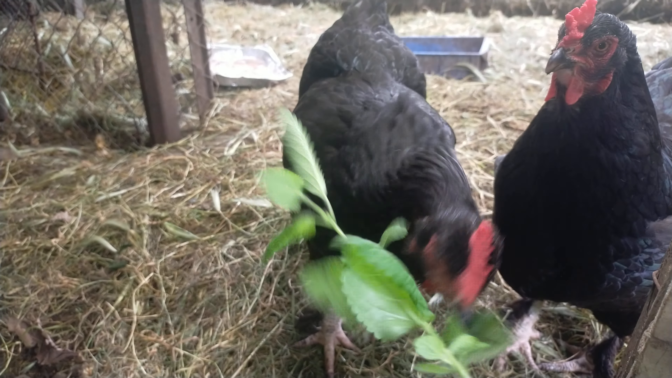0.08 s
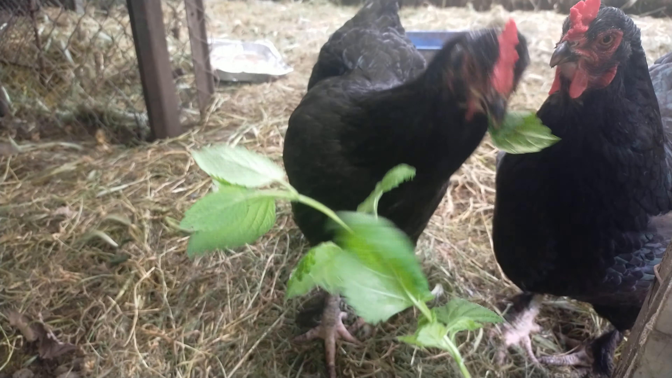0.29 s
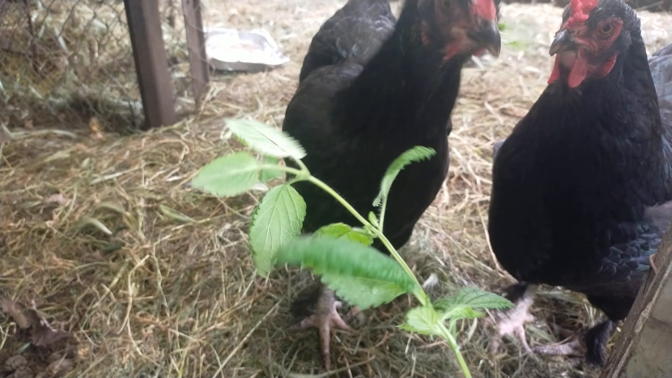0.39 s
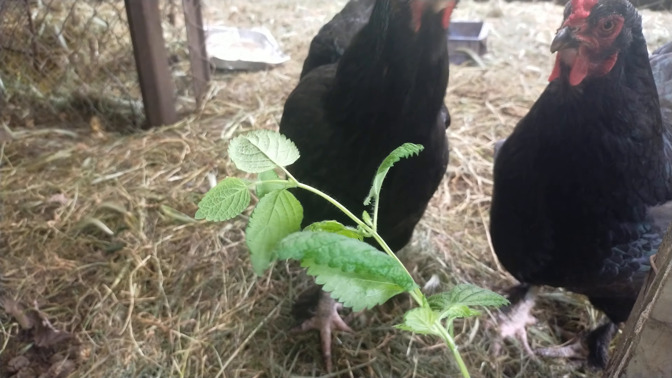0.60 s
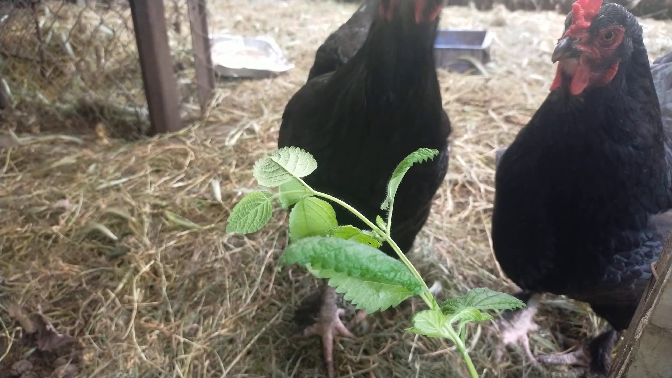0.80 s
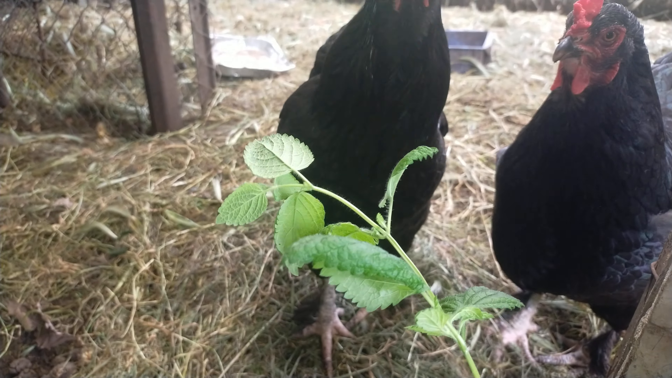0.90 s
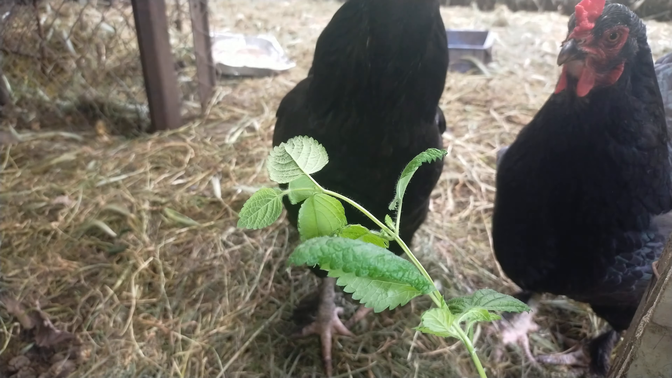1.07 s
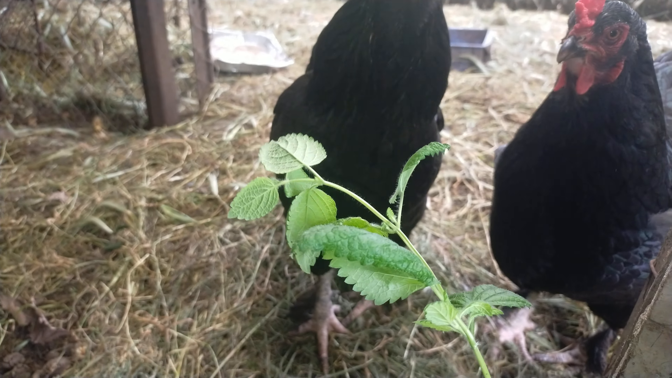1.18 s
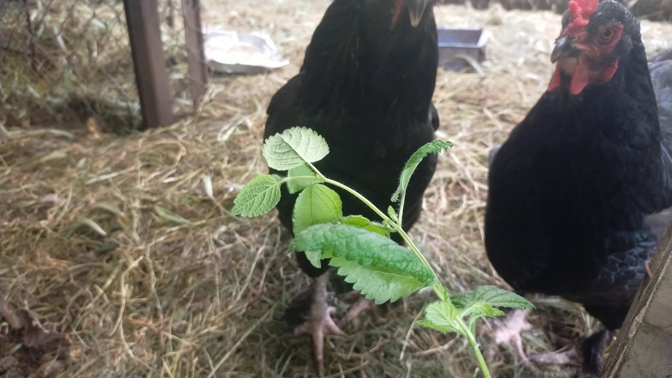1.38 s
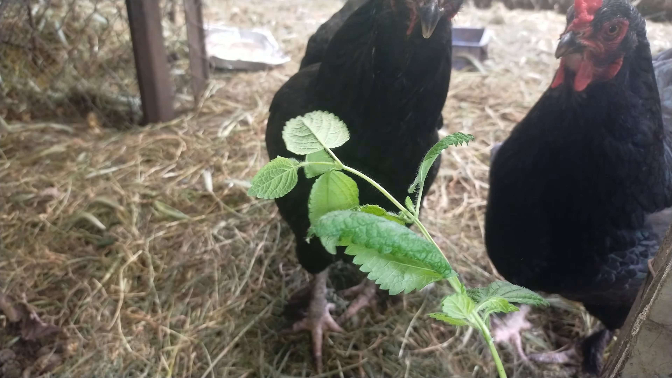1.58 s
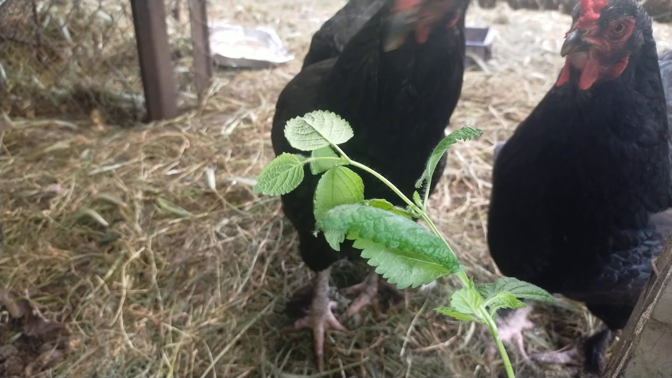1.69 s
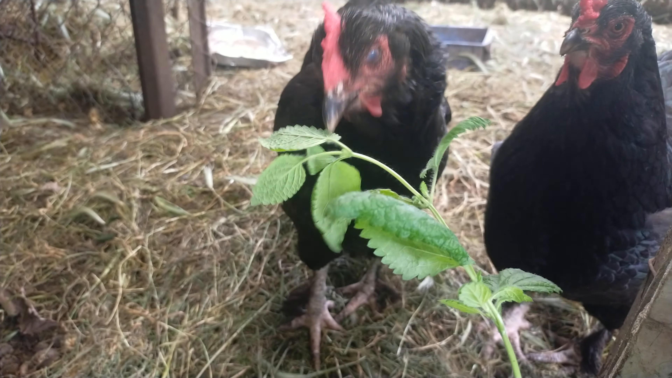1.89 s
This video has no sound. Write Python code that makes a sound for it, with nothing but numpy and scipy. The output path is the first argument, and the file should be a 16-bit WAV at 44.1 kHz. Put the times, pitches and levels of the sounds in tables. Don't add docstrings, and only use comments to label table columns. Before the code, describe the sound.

Leaf ripped by a pecking hen, crisp snaps and dull little thumps over faint outdoor hum

```python
import sys
import numpy as np
from scipy import signal
from scipy.fft import rfft, irfft
from scipy.io import wavfile

SR = 44100
rng = np.random.default_rng(int(sys.argv[2]) if len(sys.argv) > 2 else 0)


def inscribe(sig):
    pcm = np.round(np.clip(np.atleast_2d(sig).T, -1, 1) * 32767)
    wavfile.write(sys.argv[1], SR, pcm.astype(np.int16))


def how_loud(loudness_db):
    steps = np.asarray(loudness_db, float) / 20
    return 10 ** steps


N = 83790


def at_hz(points, hz):
    points_hz, points_db = np.transpose(points)
    return np.interp(np.log(hz), np.log(points_hz), points_db)


def rms_one(x):
    return x / np.sqrt(np.mean(x ** 2) + 1e-20)


def drift(rate_hz):
    r = np.exp(-80 * np.pi * rate_hz / SR)
    slow = signal.lfilter([1], [1, -2 * r, r * r], rng.standard_normal(N // 40 + 2002))[2000:]
    return np.interp(np.arange(N) / 40, np.arange(len(slow)), rms_one(slow))


def ring(x, hz, t60_s):
    r, w = how_loud(-60 / (t60_s * SR)), 2 * np.pi * hz / SR
    return signal.lfilter([0, np.sin(w)], [1, -2 * r * np.cos(w), r * r], x + 1e-18)


def banded_noise(spectrum, patchy_db, rate_hz):
    hz = np.maximum(np.arange(N // 2 + 1) * SR / N, 1)
    shaped = rfft(rng.standard_normal(N)) * how_loud(at_hz(spectrum, hz))
    out, together = 0, drift(1.6)
    for centre in 20 * 2 ** np.arange(0, 9.1, .5):
        window = np.cos(np.pi * np.clip(np.log2(hz / centre), -.5, .5)) ** 2
        flicker = how_loud(patchy_db * (0.44 * together + drift(rate_hz)))
        out = out + irfft(shaped * window, N) * flicker
    return rms_one(out)


# hz, level_db (per Hz)
HUM_COLOUR, HUM_DB = [(15, -50), (25, -2.5), (124, -6), (294, -21.5), (450, -21.5), (1050, -16.5),
                      (2500, -42), (3250, -76), (5500, -120)], -60.5
# hz, level_db (per Hz)
AIR_COLOUR, AIR_DB = [(1350, -45.5), (2300, -12.5), (3550, -12), (4600, -8.5), (7410, -1), (8300, -10.5),
                      (10800, -59.5), (18300, -120)], -77


def background():
    air = how_loud(AIR_DB) * banded_noise(AIR_COLOUR, patchy_db=.7, rate_hz=14.0)
    hum = how_loud(HUM_DB) * banded_noise(HUM_COLOUR, patchy_db=-0.3, rate_hz=1.0)
    return hum + air


# hz, level_db
BODY_MODES = [(1000, -14), (1500, -3), (2250, -1), (3500, -2.5), (4700, -11)]
BODY_LOW_HZ, BODY_HIGH_HZ = 595, 5000
CRACK_CYCLES = 10.5
PORT_HZ, PORT_T60_S, PORT_DB = 7570, 0.0028, -9


def crack_sound(clicks, colour):
    dealt, bright = rng.integers(0, 12, N), 0
    for k, hz in enumerate(np.geomspace(4700, 8000, 12)):
        onset = ring(clicks * (dealt == k), hz, CRACK_CYCLES * 2 / hz)
        bright = bright + how_loud(at_hz(colour, hz)) * ring(onset, hz, CRACK_CYCLES / hz)
    bright = bright + how_loud(PORT_DB) * ring(bright, PORT_HZ, PORT_T60_S)
    body_band = signal.butter(1, [BODY_LOW_HZ, BODY_HIGH_HZ], "band", fs=SR, output="sos")
    body = how_loud(4.0) * signal.sosfilt(body_band, clicks)
    for hz, db in BODY_MODES:
        patchy = how_loud(db + 6.3 * drift(20.0))
        body = body + patchy * ring(clicks, hz * (1 + 0.076 * rng.standard_normal()), 0.0043)
    return bright, body


CRACKS_PER_S, CRACK_SPREAD_DB, HISS_DB = 1700, 2.5, -2


def crackle(moves, colour, body_db):
    t, power = np.arange(N) / SR, 0
    for peak_s, rise_s, fall_s, db in moves:
        away = np.where(t < peak_s, (peak_s - t) / rise_s, (t - peak_s) / fall_s)
        power = power + how_loud(2 * db) * np.exp(-2 * away)
    sizes = how_loud(CRACK_SPREAD_DB * np.minimum(rng.exponential(1, N), 4)) * rng.choice([-1, 1], N)
    cracks = rms_one(sizes * (rng.random(N) < CRACKS_PER_S / SR))
    clicks = cracks + how_loud(HISS_DB) * rng.standard_normal(N)
    bright, body = crack_sound(clicks, colour)
    return np.sqrt(power) * (rms_one(bright) + how_loud(body_db) * rms_one(body))


# peak_s, rise_s, fall_s, level_db
RUSTLES = [(.02, 0.051, 0.087, -70.5), (.07, 0.0056, 0.012, -63.5), (0.092, 0.0076, 0.004, -61),
           (0.13, 0.0097, 0.0082, -37), (0.153, 0.006, 0.028, -50.5), (0.233, 0.0048, 0.0062, -56),
           (0.291, 0.086, 0.078, -56), (0.374, .012, 0.011, -46), (.388, .004, 0.0031, -53),
           (0.518, 0.011, 0.0095, -51.5), (0.566, 0.036, 0.019, -55), (.65, .02, 0.032, -61),
           (.705, 0.0058, 0.0077, -51.5), (.815, 0.032, 0.029, -60), (.865, 0.015, 0.005, -57.5),
           (.95, 0.43, 0.19, -74.5), (1.09, .04, 0.026, -64.5), (1.274, 0.031, 0.034, -54),
           (1.317, .004, 0.0038, -61), (1.352, 0.004, 0.01, -54), (1.9, 0.0063, 0.0085, -69)]
# hz, level_db
LEAF_COLOUR = [(2650, -55), (4500, -21.5), (4970, -29.5), (7150, 4.5), (7830, -12.5), (8300, -28.5),
               (10800, -55), (18300, -120)]


def leaf_rustles():
    return crackle(RUSTLES, LEAF_COLOUR, body_db=-20.5)


# start_s, peak_db, pitch_hz, swell_cycles
THUMPS = [(0.0536, -35, 513, 0.11), (0.131, -36, 746, 0.12), (0.2113, -41.5, 934, 1.3),
          (0.2092, -46.5, 561, 0.99), (.209, -57.5, 304, 2.1), (0.2555, -45, 1298, 0.39),
          (.346, -48.5, 100, 0.75), (0.3507, -32, 520, 0.12), (0.3975, -44, 507, 0.12),
          (.4085, -33, 440, 0.19), (.441, -54, 1100, 3.5), (.4543, -31.5, 324, 0.4),
          (0.4641, -36, 330, 0.2), (0.4848, -28.5, 312, 0.5), (.4822, -43, 250, .3), (0.485, -44, 86, 0.7),
          (.5057, -46, 350, 0.2), (.606, -55, 880, 3), (.7535, -55, 900, 1.6), (0.906, -46.5, 760, 0.72),
          (0.906, -50, 930, 1.9), (0.9165, -49.5, 870, 1.8), (.919, -47, 780, 0.46),
          (1.055, -46, 92.6, 0.42)]
THUMP_CUT_HZ, THUMP_TICK_DB = 1700, -19
BRIGHT_EDGE_HZ, TICK_RING_HZ = 4500, 6900


def brighten(x):
    return signal.sosfilt(signal.butter(7, BRIGHT_EDGE_HZ, "high", fs=SR, output="sos"), x)


def thumps():
    dull, ticks, t = np.zeros(N + SR), np.zeros(N + SR), np.arange(4000) / SR
    for start_s, db, hz, cycles in THUMPS:
        at = int(start_s * SR)
        swell = t * hz / cycles
        dull[at:at + 4000] -= how_loud(db) * np.sin(2 * np.pi * hz * t) * swell * np.exp(1 - swell)
        burst = rng.standard_normal(4000) * np.exp(-((t - .0006) / 0.0002) ** 2)
        ticks[at:at + 4000] += how_loud(db) * (hz > 200) * burst
    dull = signal.sosfilt(signal.butter(2, THUMP_CUT_HZ, fs=SR, output="sos"), dull)
    tick_sound = brighten(ticks) + how_loud(-9) * ticks + how_loud(-2.5) * ring(ticks, TICK_RING_HZ, 0.004)
    return (dull + how_loud(THUMP_TICK_DB) * tick_sound)[:N]


# start_s, peak_db, pitch_hz
FAINT_SNAPS = [
    (.0873, -51, 7400),
    (.0915, -47, 7200),
    (.1712, -44, 6900),
    (.1868, -46, 7000),
    (.9058, -53, 7000),
    (1.138, -54, 7000),
    (1.208, -54.5, 7300),
    (1.418, -61, 7200),
]
# start_s, peak_db, pitch_hz
TEAR = [(0.1097, -39, 7160), (0.1165, -41, 6820), (0.1188, -39, 6940), (0.1206, -41, 6970),
        (0.124, -40, 6720), (0.1253, -35, 7180), (0.1268, -26, 7300), (0.1281, -23, 7380),
        (0.1307, -27, 6950), (0.1324, -30, 6720), (0.1349, -33, 7230), (0.137, -38, 7180),
        (0.1409, -40, 6990), (0.1465, -41, 6950), (0.1534, -34, 7230), (0.1565, -42, 6870),
        (0.1625, -42, 7000), (0.2047, -43, 6900), (0.2067, -10, 6790), (0.2091, -17, 6800),
        (0.2105, -7, 6560), (0.2123, -11, 6830), (0.2135, -5, 6580), (0.2156, -21, 6400),
        (0.217, -22, 6450), (0.2183, -18, 6390), (0.2215, -22, 6650), (0.2235, -26, 6550),
        (0.2252, -40, 6570), (0.2274, -28, 7140), (0.2303, -31, 7220), (0.232, -35, 7090),
        (0.2343, -28, 7100), (0.2371, -30, 7040), (0.2389, -35, 7200), (0.2409, -39, 6860),
        (0.2426, -43, 6640), (0.244, -39, 6900), (0.2479, -34, 6900), (0.2496, -36, 7420),
        (0.2508, -36, 7030), (0.2528, -40, 7020), (0.2538, -23, 7180), (0.2557, -31, 7010),
        (0.2587, -36, 6870), (0.26, -41, 7060)]
# start_s, peak_db, pitch_hz
SNAPS = [(0.3623, -43, 7090), (0.3651, -44, 6570), (0.3663, -41, 7030), (0.3688, -44, 7070),
         (0.3707, -37, 6940), (0.374, -39, 7080), (0.3762, -37, 6910), (0.3796, -44, 7060),
         (0.3809, -40, 7100), (0.3832, -44, 6950), (0.3875, -37, 7290), (0.4213, -37, 7110),
         (0.4224, -42, 7040), (0.4236, -40, 6700), (0.425, -44, 6650), (0.4271, -40, 6360),
         (0.4385, -45, 6710), (0.4396, -35, 6620), (0.4419, -38, 6670), (0.4433, -43, 7140),
         (0.4533, -32, 7030), (0.4594, -43, 6750), (0.461, -38, 6880), (0.4624, -42, 6990),
         (0.4647, -43, 7070), (0.4672, -42, 6960), (0.4841, -44, 6820), (0.4872, -44, 6000),
         (0.5239, -44, 6800), (0.5518, -42, 7070), (0.5589, -43, 6920), (0.5611, -43, 7160),
         (0.5628, -43, 7280), (0.5697, -42, 7010), (0.5721, -41, 6990), (0.5785, -40, 6520),
         (0.5956, -42, 6870), (0.5978, -45, 7270), (0.7032, -46, 7120), (0.7062, -45, 6950),
         (0.7073, -47, 6820), (0.7128, -45, 6990), (0.715, -45, 6910), (0.719, -45, 6990),
         (0.7453, -40, 6630), (0.7473, -47, 7020), (0.8777, -45, 6530), (0.8824, -45, 6740),
         (0.8873, -43, 6680), (1.2922, -46, 7020), (1.3483, -46, 7490), (1.3499, -46, 7220)]
# hz, level_db
SNAP_MODES = [(7500, -16), (6050, -11), (5600, -12)]
# hz, level_db
SNAP_KNOCKS = [(1950, -34), (3700, -50)]
SNAP_SWELL_S, SNAP_LEAD_S = .00062, -.0001
SOFT_BELOW_DB = -25


def snaps():
    out, t = np.zeros(N), np.arange(300) / SR
    for start_s, db, pitch_hz in TEAR + SNAPS + FAINT_SNAPS:
        soft = np.clip((SOFT_BELOW_DB - db) / 12, 0, 1)
        rise_s = SNAP_SWELL_S * (1 + .25 * soft)
        swell = (t / rise_s * np.exp(1 - t / rise_s)) ** 4
        luck = rng.normal(0, 1, (6, 2))
        snap = np.sin(2 * np.pi * pitch_hz * t + 3 * luck[5, 0])
        for (hz, mode_db), (a, b) in zip(SNAP_MODES + SNAP_KNOCKS, luck):
            mode = np.sin(2 * np.pi * hz * (1 + .02 * b) * t + 3 * b)
            snap = snap + how_loud(mode_db - 7 * soft + 2.5 * a) * mode
        snap = swell * snap
        at = int((start_s - SNAP_LEAD_S - rise_s) * SR)
        out[at:at + 300] += how_loud(db) * snap / np.abs(snap).max()
    return out


# peak_s, rise_s, fall_s, level_db
CRUNCHES = [(.1055, 0.00053, 0.027, -50), (.423, 0.004, 0.005, -48), (.441, 0.0018, 0.0063, -41),
            (.461, 0.0037, 0.013, -44), (.4835, 0.001, 0.0074, -51), (.519, 0.0012, 0.0023, -48),
            (.578, 0.0022, 0.0036, -42.5), (.596, 0.014, 0.018, -51), (.718, 0.0075, 0.014, -52.5),
            (.746, 0.0043, 0.012, -52.5), (.885, 0.014, 0.014, -51), (1.29, 0.01, 0.0091, -66),
            (1.35, 0.0087, .01, -67.5)]
# hz, level_db
STALK_COLOUR = [(2650, -58), (4500, -21.5), (5680, -10.5), (6830, 7), (7850, -8), (8300, -26), (10800, -57),
                (18300, -120)]


def stalk_crunches():
    return crackle(CRUNCHES, STALK_COLOUR, body_db=-13)


# peak_s, rise_s, fall_s, level_db
SHREDS = [
    (.2075, .0004, 0.022, -30),
    (.2535, 0.00061, .003, -46),
]


def flying_shreds():
    return crackle(SHREDS, STALK_COLOUR, body_db=-16)


# peak_s, half_length_s, pitch_hz, level_db
MURMURS = [
    (1.184, 0.26, 255, -68),
    (1.14, 0.27, 343, -73.5),
    (0.53, 0.13, 350, -78),
    (1.43, 0.12, 418, -81.5),
]


def murmur():
    out, t = 0, np.arange(N) / SR
    for peak_s, half_s, hz, db in MURMURS:
        breath = rms_one(ring(rng.standard_normal(N), hz, 0.12))
        out = out + how_loud(db) * np.exp(-((t - peak_s) / half_s) ** 2) * breath
    return out


# start_s, length_s, pitch_hz, level_db
CHIRPS = [(.59, .014, 2250, -61), (.818, .022, 3620, -75), (1.283, .014, 4050, -70),
          (1.302, .012, 4000, -70), (1.502, .03, 6250, -70), (1.513, .07, 5900, -69),
          (1.53, .03, 5400, -81), (1.54, .12, 6150, -78), (1.805, .045, 4750, -80), (1.84, .04, 5180, -81),
          (.93, .1, 6750, -76), (.97, .1, 5650, -80), (.81, .05, 5150, -77), (.566, .01, 2300, -68)]
CHIRP_SAG_HZ_PER_S, CHIRP_WIDTH_HZ = 1500, 160


def birds():
    out, t = np.zeros(N), np.arange(N) / SR
    for start_s, length_s, hz, db in CHIRPS:
        pole = np.exp(-np.pi * CHIRP_WIDTH_HZ / SR)
        blur = signal.lfilter([1], [1, -pole], rng.standard_normal((2, N)))
        since = t - start_s
        phase = 2 * np.pi * (hz * since - .5 * CHIRP_SAG_HZ_PER_S * since ** 2)
        shape = np.sin(np.pi * np.clip(since / length_s, 0, 1) ** .5)
        out += how_loud(db) * shape * rms_one(blur[0] * np.sin(phase) + blur[1] * np.cos(phase))
    return out


def scene():
    plant = leaf_rustles() + thumps() + snaps() + stalk_crunches() + flying_shreds()
    return (plant + murmur() + birds() + background())[None]


def roll_off(x):
    return signal.sosfilt(signal.butter(12, 8660, fs=SR, output="sos"), x)


CUTOFF_HZ, LEAK_DB, DITHER_DB = 9425, -78.5, -99


def record(dry):
    cut = signal.sosfilt(signal.cheby2(14, 75, CUTOFF_HZ, fs=SR, output="sos"), dry)
    dither = how_loud(DITHER_DB) * rng.standard_normal(dry.shape)
    return roll_off(cut + how_loud(LEAK_DB) * dry + dither)


dry = scene()
out = record(dry)
inscribe(out)
```